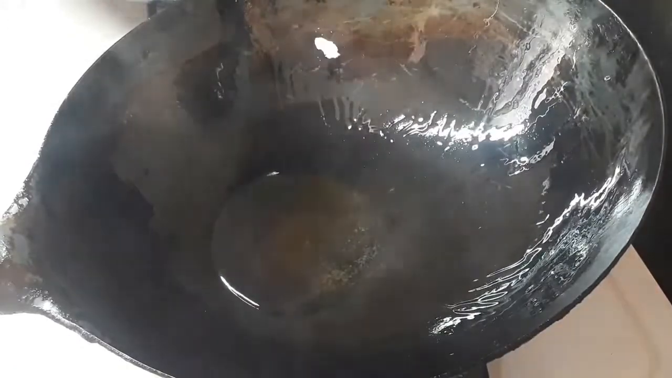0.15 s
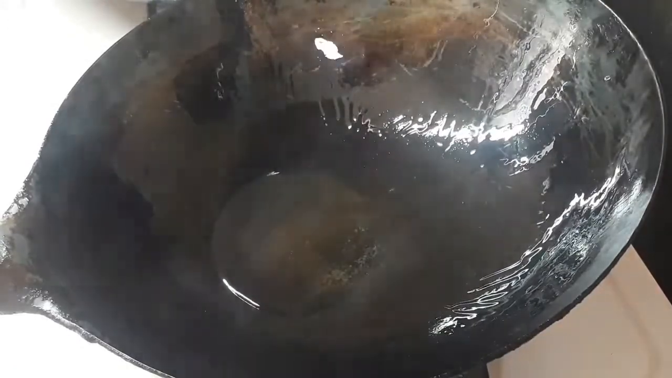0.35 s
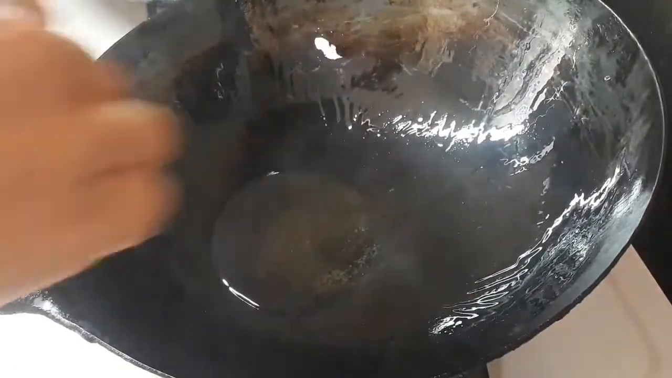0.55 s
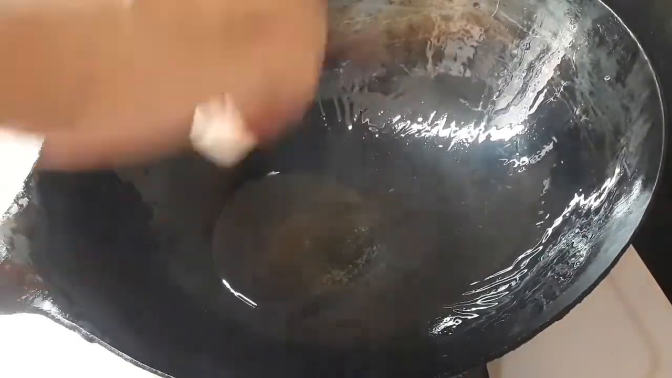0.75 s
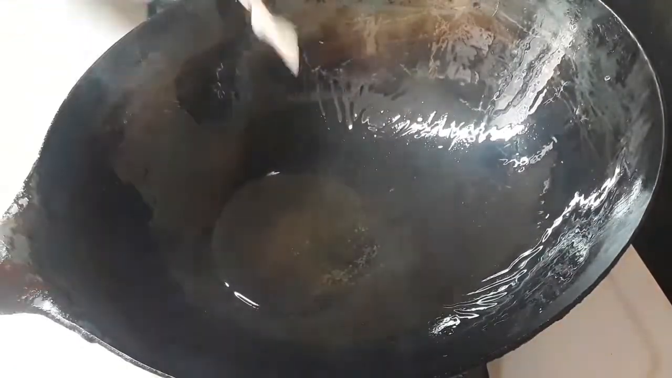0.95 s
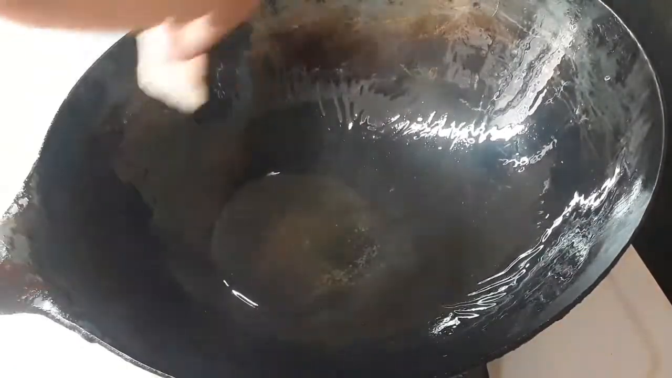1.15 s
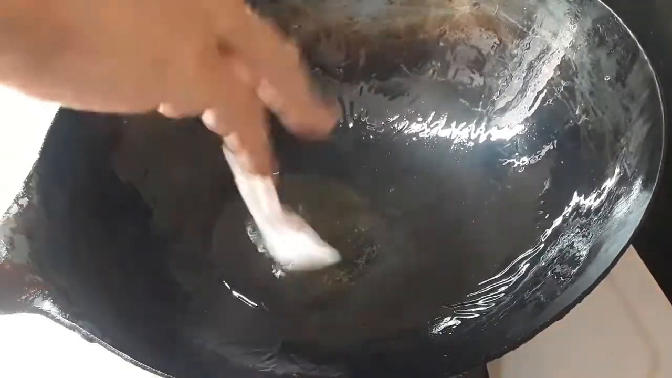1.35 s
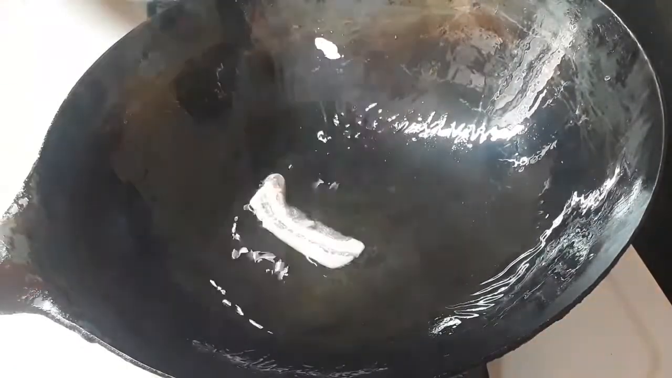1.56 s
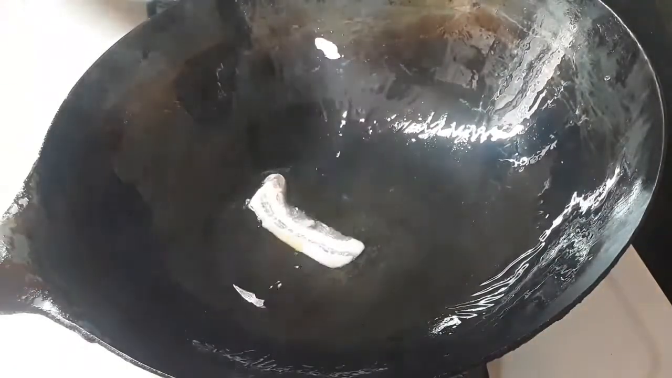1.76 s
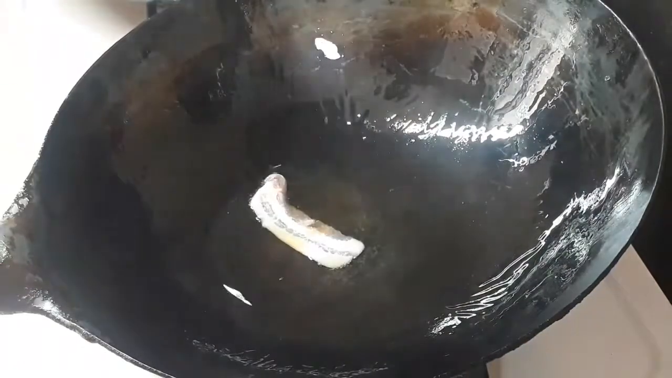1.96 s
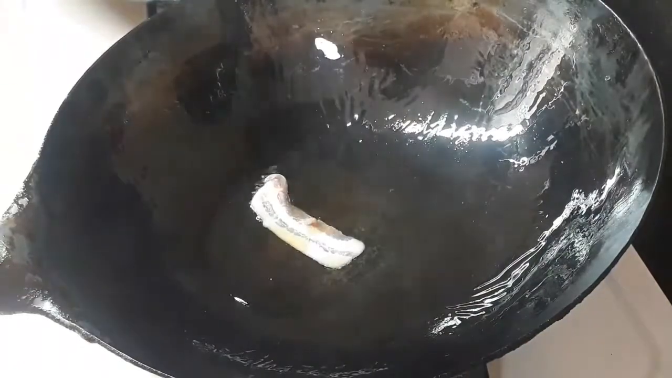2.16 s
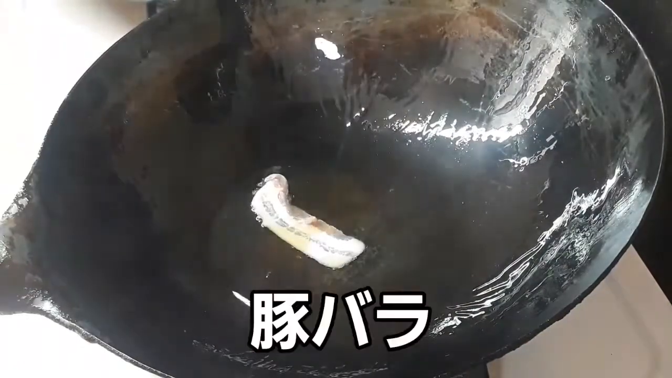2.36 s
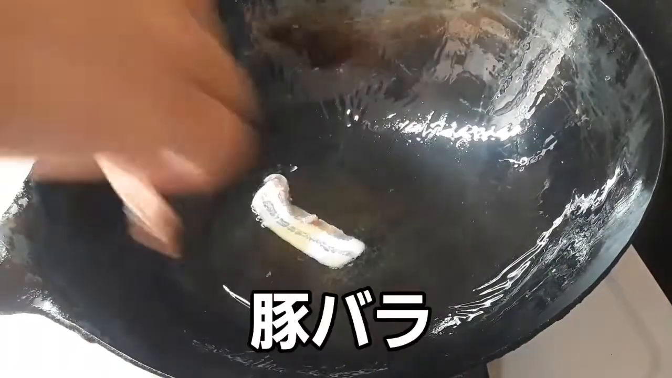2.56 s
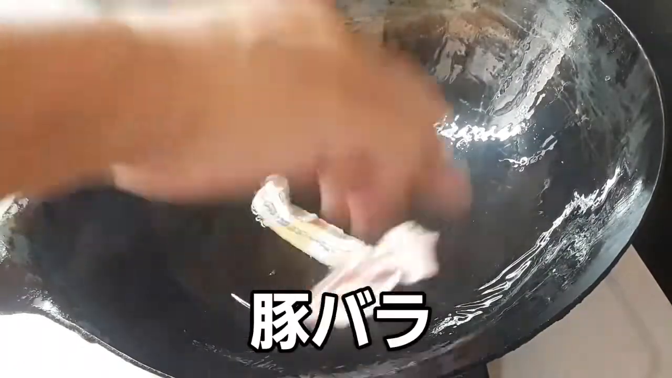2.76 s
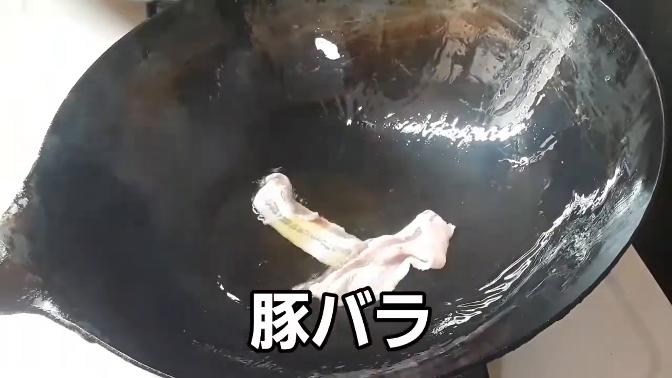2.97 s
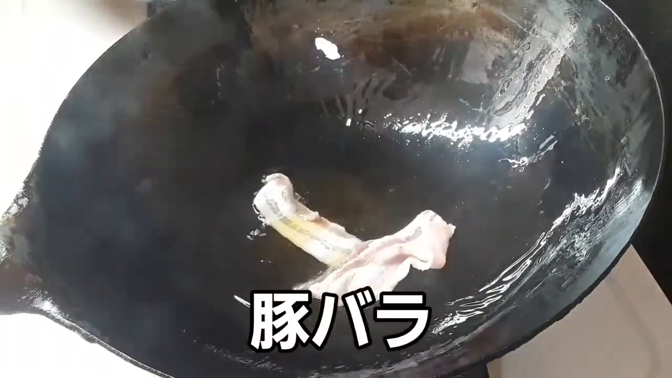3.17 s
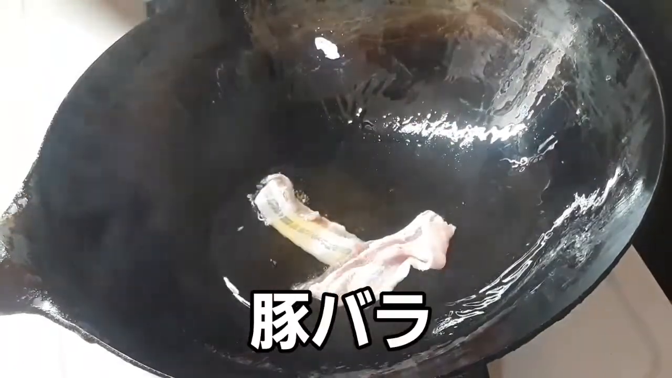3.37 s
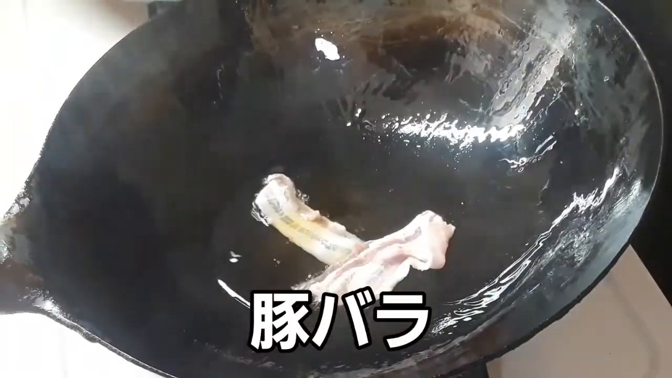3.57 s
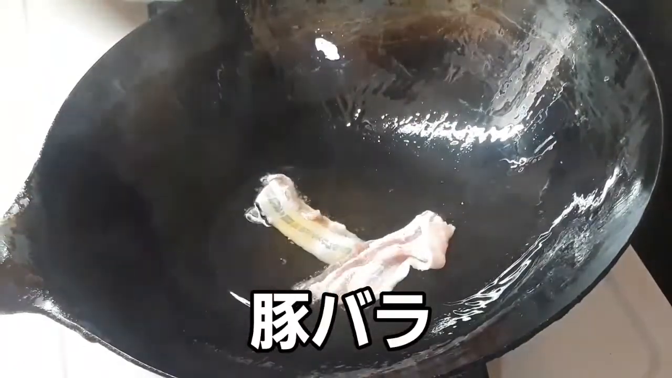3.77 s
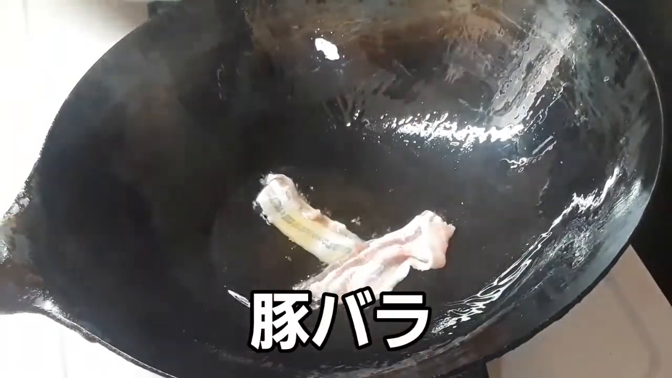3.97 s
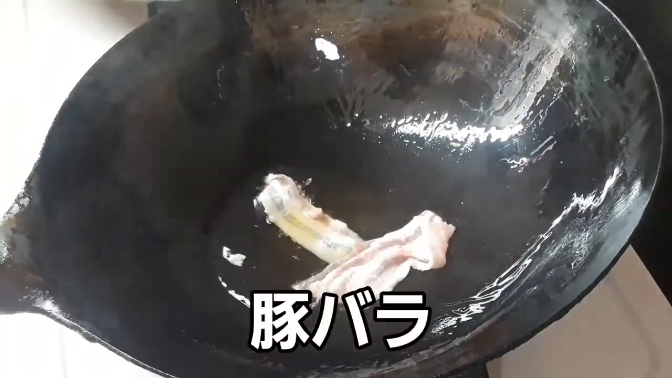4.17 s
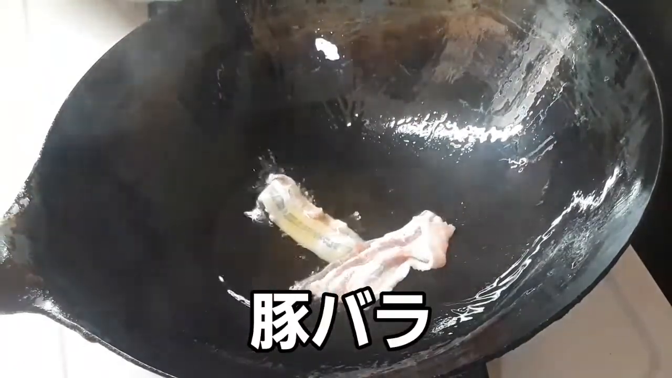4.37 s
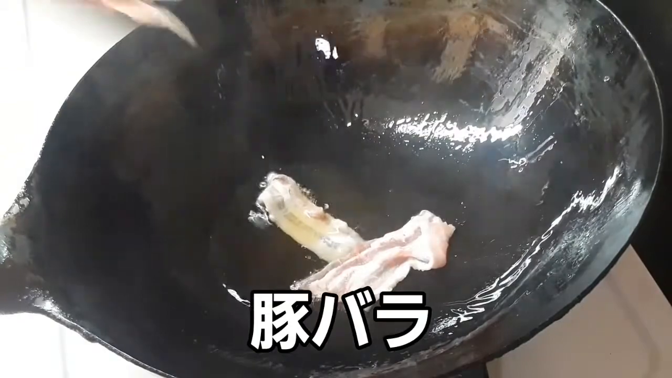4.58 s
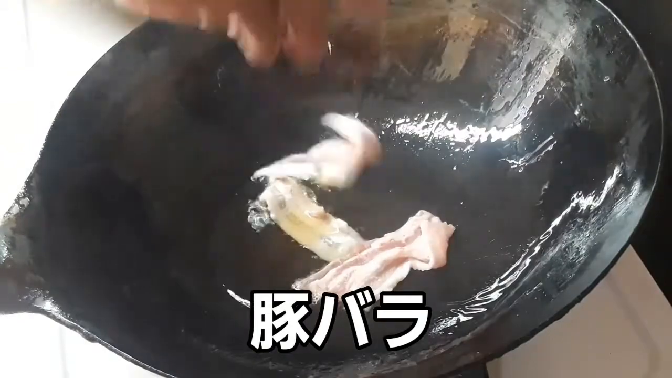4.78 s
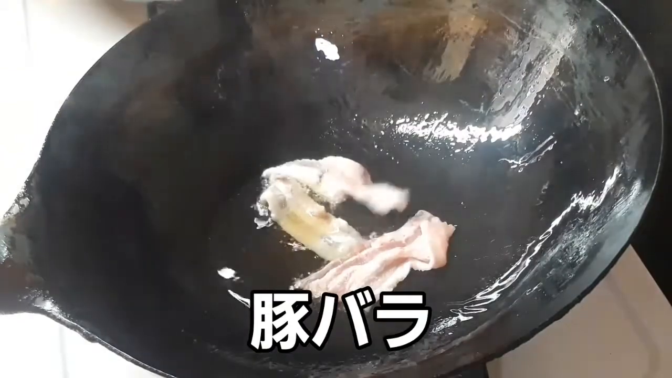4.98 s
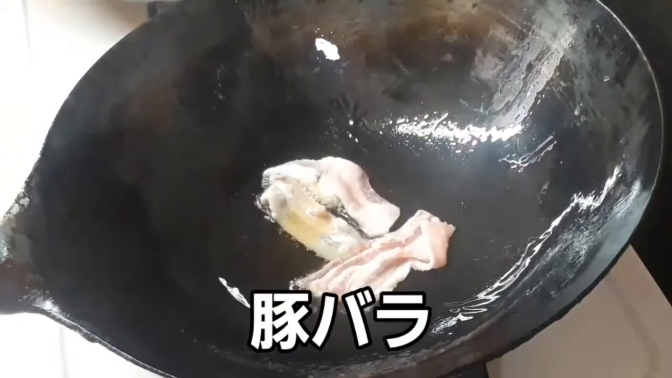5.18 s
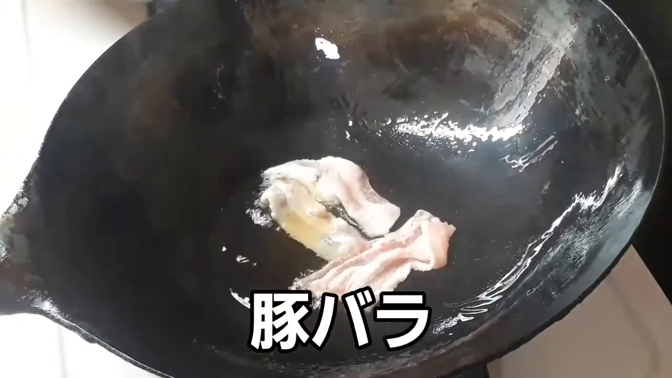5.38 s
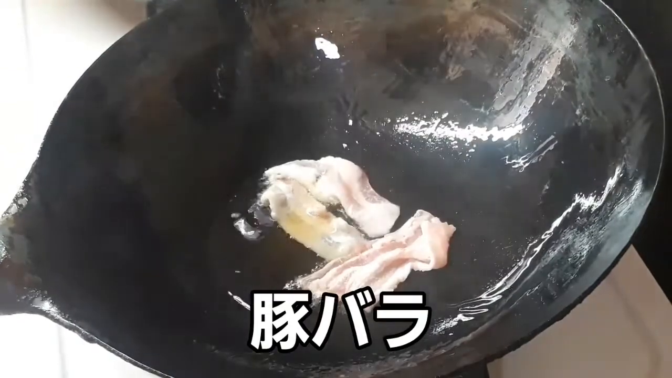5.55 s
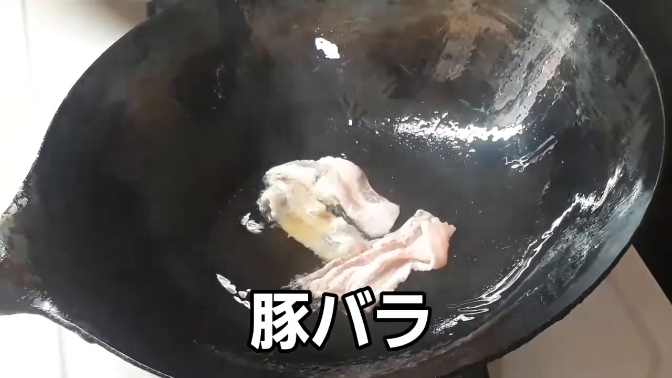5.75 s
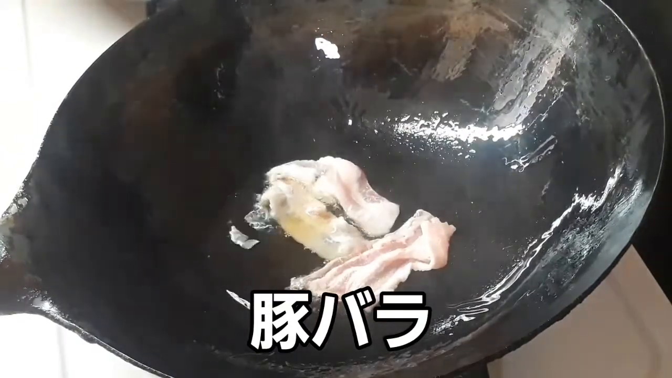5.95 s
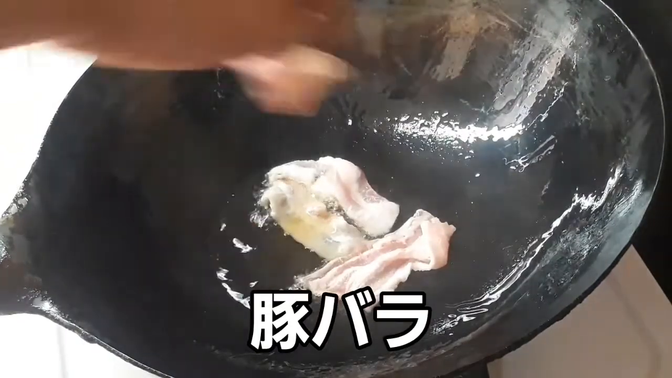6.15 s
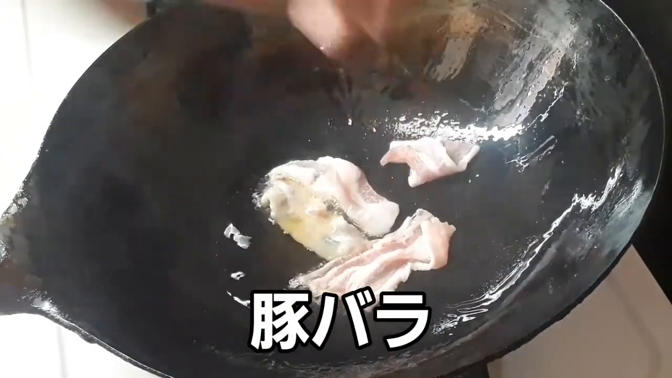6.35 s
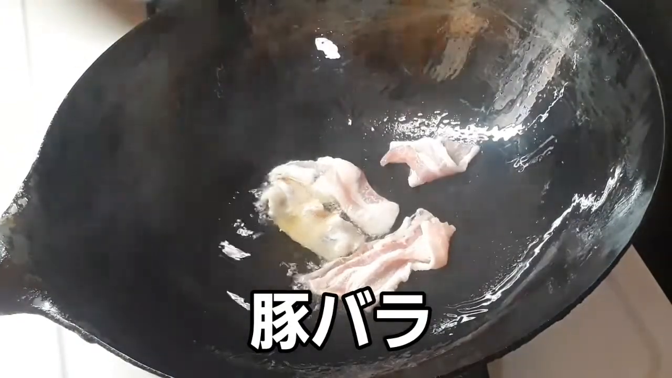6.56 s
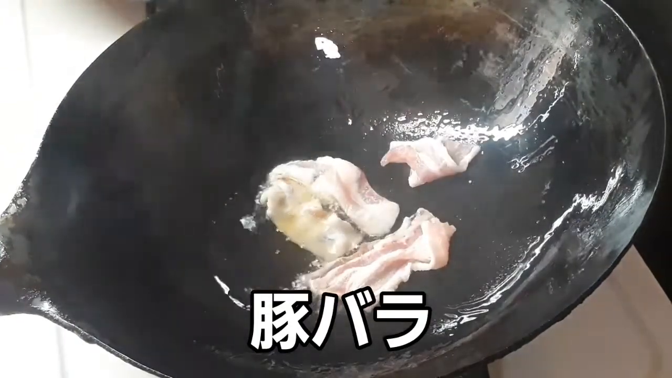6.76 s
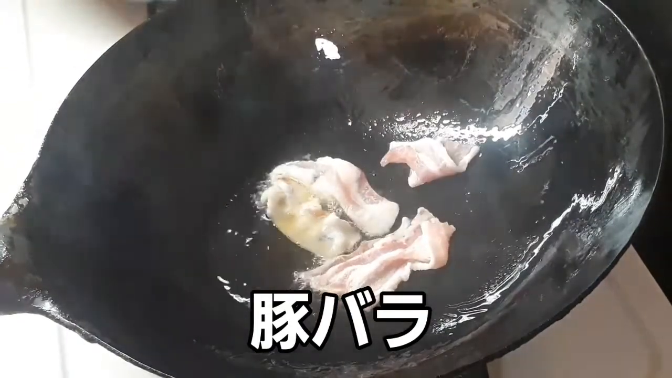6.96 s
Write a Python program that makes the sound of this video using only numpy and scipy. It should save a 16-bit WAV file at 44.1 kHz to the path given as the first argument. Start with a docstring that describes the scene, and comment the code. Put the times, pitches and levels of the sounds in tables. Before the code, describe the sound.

A low gas burner rush, a faint motor hum and a soft hiss of hot oil are heard close up in a small kitchen. At the very start there is a brief oil spit and a thin, falling whistle of steam, with a light knock at about 0.3 seconds and a sharp spit at 1 second. At about 1.5 seconds a slice of raw pork lands in the iron wok and sputters in short, irregular jets of steam. Near 2.9 seconds a second slice starts a much louder, dense sizzle, with bubbling underneath, sharp spits of oil and duller pops that ring slightly in the pan. The sizzle flares again at 4.8 seconds with a third slice, followed by a strong pop around 5.3. A fourth lands near 6.3 seconds amid a cluster of spits. At 6.4 everything steps down in level and keeps sizzling until about 7 seconds.

```python
"""Raw pork sizzles in hot oil: four slices are laid in turn into an iron wok in a small kitchen.
The first sputters in short jets of steam; from the second on, water boils out in countless bursting
bubbles, whose clicks merge into a dense sizzle, with sharp spits of oil and duller pops of steam.
All of these excite the modes of the wok. A gas burner and a motor hum lie underneath; a thin whistle
and a light knock come at the start, and near the end the whole sound steps down in level."""
import sys
import numpy as np
from scipy import signal
from scipy.io import wavfile
from scipy.ndimage import uniform_filter1d

SR = 44100
rng = np.random.default_rng(int(sys.argv[2]) if len(sys.argv) > 2 else 0)


def to_wav(sig):
    """Store sig (one row per channel, or 1-D mono) as 16-bit WAV at the path in sys.argv[1].

    Samples outside -1..1 are clipped; the rate is SR.
    """
    pcm = np.clip(np.atleast_2d(sig), -1, 1) * 32767
    pcm = np.round(pcm).astype(np.int16)
    wavfile.write(sys.argv[1], SR, pcm.T)  # frames by channels


N = 309582
TIME = np.arange(N) / SR
EVENT_TIME = np.arange(SR // 3) / SR

# Levels in the tables are relative: each layer also has its own gain.
# spectrum of the sputtering: f/Hz, level/dB
SPUTTER_SPECTRUM = [(200, 0), (600, -6.5), (1400, -0.5), (2300, -2.5), (2700, -6), (2900, -14), (3100, -4),
                    (3350, -3), (5000, 1.5), (7000, 3.5), (8500, 0.5), (10300, -4), (11500, -12),
                    (12400, -58)]
# steam jets from under the meat: t/s, peak level/dB, centre f/Hz, width/octaves
STEAM_JETS = [(1.55, -29, 7840, 0.66), (1.5754, -21.5, 5460, 0.71), (1.588, -20, 2900, 0.56),
              (1.613, -17, 6500, .6), (1.644, -20.5, 3600, .75), (1.691, -21.5, 4870, 0.18),
              (1.7964, -20.5, 5170, 0.76), (1.888, -29, 6100, 0.45), (1.962, -21, 5100, 0.24),
              (2.002, -30, 1880, 0.17), (2.0277, -27.5, 1440, 0.13), (2.117, -26, 2000, 0.9),
              (2.1478, -22, 3900, 0.61), (2.2204, -17, 3100, .42), (2.262, -19.5, 3800, 0.44),
              (2.368, -31, 7200, .5), (2.404, -27, 5500, 0.79), (2.581, -24, 3070, 1),
              (2.6437, -32.5, 3530, 0.21), (2.683, -27, 4840, 0.27), (2.714, -21, 3350, 0.44),
              (2.7264, -22.5, 2060, 0.47), (2.837, -30, 6600, 1), (3.85, -6.5, 6000, 0.13),
              (5.1644, -10.5, 3560, .3), (5.284, -7.5, 3370, 0.27), (5.89, -11, 5760, 0.51),
              (6.986, -11, 3820, 0.33)]
# steam pockets bursting under the meat: t/s, peak level/dB, f/Hz, T60/s
STEAM_POPS = [(1.679, -23.5, 2050, 0.025), (1.8669, -19.5, 2100, .016), (3.835, -12.5, 1850, 0.031),
              (3.998, -13, 2260, 0.018), (4.101, -18, 1270, .04), (4.306, -12.5, 2250, .04),
              (4.503, -10.5, 2070, 0.025), (4.864, -16.5, 1460, 0.043), (5.078, -11.5, 1720, 0.053),
              (5.284, -3.5, 2160, 0.048), (5.317, -10, 1770, 0.013), (5.756, -15.5, 1495, 0.11),
              (5.874, -9.5, 1350, 0.013), (6.179, -10, 1667, .045), (6.219, -16, 1770, 0.05),
              (6.322, -12.5, 1850, .019), (6.349, -13, 1800, 0.013), (6.393, -17.5, 700, 0.016),
              (6.395, -12.5, 2340, .05)]
# water drops exploding in the oil: t/s, peak level/dB
OIL_SPITS = [(-.012, -15.5), (.116, -44), (0.9907, -14), (3.029, -13.5), (3.851, -17), (4.02, -12),
             (4.3685, -13), (4.502, -9), (4.769, -13.5), (5.338, -11), (5.467, -15), (5.495, -23),
             (6.1, -15), (6.287, -13), (6.302, -21), (6.3221, -9.5), (6.356, -11), (6.392, -12),
             (6.6353, -13), (6.7016, -10.5), (6.791, -11), (6.877, -11), (6.975, -8.5)]
# slices two to four: t/s, flare level/dB, fizz level/dB, warm-up/s, boiling level/dB, steam level/dB
LATER_SLICES = [(2.86, -18.5, -18, 0.39, -27, -25), (4.834, -22, -15, 1.06, -36, -23),
                (6.27, -24.5, -21, .4, -31, -55)]
FIRST_SLICE_S, SIZZLE_START_S = 1.55, LATER_SLICES[0][0]
FIRST_ATTACK_S, LATER_ATTACK_S = 0.074, 0.036  # rise of the flare as a slice lands


def gain_of(db):
    """Converts a level to an amplitude ratio."""
    return 10 ** (np.asarray(db) / 20)


def unit_rms(x):
    """Normalises the mean power to 1."""
    return x / np.sqrt(np.mean(x ** 2) + 1e-20)


def unit_peak(x):
    """Normalises the mean power of the loudest 3 ms to 1."""
    return x / np.sqrt(uniform_filter1d(x ** 2, size=128).max())


def power_sum(gains):
    """Incoherent addition: the powers of independent sources add."""
    return np.sqrt(sum(g ** 2 for g in gains))


def at_frequency(points, hz):
    """Interpolates a curve on a logarithmic frequency axis."""
    f, value = np.transpose(points)
    return np.interp(np.log(hz + 1), np.log(f + 1), value)


def add(mix, s, sound):
    """Superposes a sound at time s, which may be negative."""
    start = round(s * SR)
    sound = sound[max(-start, 0):]
    part = mix[max(start, 0):][:len(sound)]
    part += sound[:len(part)]


def ramp(s, rise_s):
    """Linear rise from 0 to 1, starting at time s."""
    return np.clip((TIME - s) / rise_s, 0, 1)


def age(s):
    """Seconds since time s; zero before it."""
    return np.maximum(TIME - s, 0)


def decay(t, t60):
    """Exponential damping: 60 dB in t60 seconds."""
    return gain_of(-60 * t / t60)


def flare(s, attack_s, hold_s, release_s):
    """Transient envelope: linear rise, hold, exponential relaxation."""
    return ramp(s, attack_s) * np.exp(-age(s + attack_s + hold_s) / release_s)


def drift(per_s):
    """Slow random modulation of rms 1."""
    steps = rng.standard_normal(65536)
    return unit_rms(np.interp(TIME * per_s, np.arange(len(steps)), steps))


def colour(x, spectrum, size=4096):
    """Minimum-phase filter: shapes the spectrum while clicks keep their sharp front."""
    hz = abs(np.fft.fftfreq(size, 1 / SR))
    log_gain = np.log(gain_of(at_frequency(spectrum, hz)))
    response = np.exp(np.conj(signal.hilbert(log_gain)))
    taps = np.fft.ifft(response).real[:size // 2]
    return signal.oaconvolve(x, taps)[:len(x)]


def resonate(x, hz, width_hz):
    """Damped resonator of gain 1 whose centre frequency may glide."""
    carrier = np.exp(2j * np.pi * np.cumsum(hz * np.ones(len(x))) / SR)
    pole = np.exp(-np.pi * width_hz / SR)
    return 2 * (carrier * signal.lfilter([1 - pole], [1, -pole], x / carrier + 1e-18)).real


def ringing(x, peaks):
    """Linear superposition: the direct sound plus a ringing band at each spectral peak."""
    return x + sum(gain_of(db) * signal.lfilter(*signal.iirpeak(hz, hz / width, SR), x)
                   for hz, width, db in peaks)


def thud(hz, t60, push):
    """Impulse response of a small cavity: a blunt push and one damped mode."""
    t = EVENT_TIME
    return push * (t == 0) + np.sin(2 * np.pi * hz * t) * decay(t, t60)


def bursts(per_s, spread_db, clump_db, clumps_per_s):
    """Shot noise of bursting bubbles: many small clicks, few large, swelling in clumps."""
    sizes = gain_of(spread_db * np.minimum(rng.exponential(1, N), 6))
    signs = rng.choice([-1, 1], N)
    onsets = rng.random(N) < per_s / SR
    return unit_rms(sizes * signs * onsets * gain_of(clump_db * drift(clumps_per_s)))


def small_events(per_s, mean_db, spread_db, count=48):
    """Jittered event train during the full sizzle: rows of t/s, peak level/dB, size from 0 to 1."""
    jitter, strength, size = rng.random(count), rng.standard_normal(count), rng.random(count)
    times = SIZZLE_START_S + (np.arange(count) + jitter) / per_s
    return [row for row in zip(times, mean_db + spread_db * strength, size) if row[0] < N / SR]


def reverberate(x, bowl_db, room_db, bowl_t60=0.045):
    """Reverberation of one spot in the wok: direct sound, early echoes in the bowl, the room's tail."""
    # reverberation time of the kitchen: f/Hz, T60/s
    room_t60 = [(300, 0.11), (1300, 0.26), (3500, 0.3), (9000, .18)]
    t = EVENT_TIME
    bowl, tail = rng.standard_normal((2, len(t))) * (t > .001)
    hz, frame_s, spectra = signal.stft(tail, SR, nperseg=256)
    spectra = spectra * decay(frame_s, at_frequency(room_t60, hz)[:, None])
    tail = signal.istft(spectra, SR, nperseg=256)[1][:len(t)]
    echoes = gain_of(bowl_db) * unit_rms(bowl * decay(t, bowl_t60)) + gain_of(room_db) * unit_rms(tail)
    response = (t == 0) + echoes / np.sqrt(len(t))
    return signal.oaconvolve(x, response / np.linalg.norm(response))[:len(x)]


def scatter(clicks, bowl_db, room_db, spots):
    """Distributed source: clicks fall on several spots, each with its own echoes."""
    spot = rng.integers(0, spots, N)
    return sum(reverberate(clicks * (spot == k), bowl_db, room_db) for k in range(spots))


def burner():
    """Combustion noise: the gas flame's low, broadband rush."""
    # spectrum of the flame: f/Hz, level/dB
    spectrum = [(25, -66), (45, -3), (66, -1.5), (81, -11.5), (118, 1.5), (150, -7.5), (230, 1),
                (300, -5.5), (390, -4.5), (1080, -12.5), (1300, -12), (1650, -20), (2100, -19.5),
                (3000, -32), (6000, -43.5)]
    # level of the rush as heard, louder at times: t/s, level/dB
    levels = [(0, -40), (.4, -48), (.9, -43), (1.4, -48), (2.8, -44)]
    rush = unit_rms(colour(rng.standard_normal(N), spectrum))
    return rush * gain_of(np.interp(TIME, *np.transpose(levels)))


def oil_hiss():
    """Shot noise of the hot oil alone: dense, faint clicks merge into a hiss."""
    # spectrum of the oil: f/Hz, level/dB
    spectrum = [(2500, -35), (4000, -10), (6300, -9.5), (6800, -5), (7300, 2.5), (7900, -3.5), (9500, -6),
                (10800, -15.5), (12000, -65)]
    clicks = bursts(per_s=11000, spread_db=2.2, clump_db=0.68, clumps_per_s=18)
    return gain_of(-62.5) * unit_rms(colour(clicks, spectrum))


def motor_hum():
    """Three near-harmonic partials of a motor waver by random phase modulation."""
    # partials of the hum: f/Hz, level/dB
    partials = [(58.6, -59.5), (118.4, -68.5), (236.9, -61.5)]
    return sum(gain_of(db) * unit_rms(np.sin(2 * np.pi * hz * TIME + 1.17 * drift(7.6)))
               for hz, db in partials)


def knock():
    """Impact excitation: a light knock at the stove rings one hollow, heavily damped mode."""
    # the impact: t/s, peak level/dB, f/Hz, T60/s
    impacts = [(.265, -28, 966, .013)]
    spectrum = [(100, -1), (500, 3), (1800, 5), (3000, -24), (8000, -29)]  # f/Hz, level/dB
    out = np.zeros(N)
    for s, db, hz, t60 in impacts:
        hit = colour(thud(hz, t60, push=9.4), spectrum)
        add(out, s, gain_of(db) * unit_peak(reverberate(hit, bowl_db=-5, room_db=-28)))
    return out


def whistle(width_hz=260):
    """Narrow-band noise: a drop of water boils dry with a breathy, falling tone of steam."""
    # course of the whistle: t/s, f/Hz, level/dB
    glide = [(.06, 8300, -63), (.2, 8100, -61), (.245, 7740, -62), (.27, 6400, -64), (.31, 6150, -66),
             (.37, 5600, -80)]
    s, hz, db = np.transpose(glide)
    pitch = np.interp(TIME, s, hz)
    tone = resonate(resonate(rng.standard_normal(N), pitch, width_hz), pitch, width_hz)
    return unit_rms(tone) * gain_of(np.interp(TIME, s, db, left=-120, right=-120))


def wok_resonance(x):
    """Forced vibration: the frying drives the modes of the wok and its hollow."""
    # modes of the wok: f/Hz, bandwidth/Hz, level/dB re direct sound
    modes = [(423.2, 12.8, 12), (587, 77, -1.5), (666, 40, 4.5), (753, 43, 1), (875, 5.1, 9), (1006, 30, 1),
             (1145, 20, 0.5), (1263, 32, -4), (1437, 19, 0.5), (1680, 19, -1), (1880, 65, -2.5),
             (2065, 37, 2), (2368, 49, -1), (3240, 5.3, 3.5), (3688, 25, -39), (7090, 38, -5.5)]
    return ringing(x, modes)


def wok_reflections(x):
    """Interference: reflections in the wok give the sputter and all steam jets a fixed ringing colour."""
    # spectral peaks of the reflections: f/Hz, bandwidth/Hz, level/dB re direct sound
    peaks = [(2230, 190, -6), (2594, 72, 11), (3190, 74, -1), (3473, 35, 4.5), (3950, 110, -0.5),
             (4450, 55, -3), (5050, 74, -10), (5100, 57, -13), (7900, 89, -10)]
    return ringing(x, peaks)


def sputter():
    """Modulated shot noise: the first slice crackles, stirred by its jets, until the next one lands."""
    stirs = [gain_of(-39) * flare(s, 0.0082, 0.017, 0.04) for s, *_ in STEAM_JETS]
    simmer = power_sum([gain_of(-43)] + stirs)
    gate = ramp(FIRST_SLICE_S, FIRST_ATTACK_S) - ramp(SIZZLE_START_S, LATER_ATTACK_S)
    clicks = bursts(per_s=5000, spread_db=2.3, clump_db=3.9, clumps_per_s=60) * simmer * gate
    crackle = colour(scatter(clicks, bowl_db=-0.91, room_db=-2.5, spots=2), SPUTTER_SPECTRUM)
    return gain_of(-3.5) * clicks.std() * unit_rms(crackle)


def jets(skirt_db=-22):
    """Jet noise: steam breaks out with a snap and dies as a crackly rush, tuned by its gap."""
    out, t, hz = np.zeros(N), EVENT_TIME, np.geomspace(100, 13000, num=60)
    for s, db, centre_hz, octaves in STEAM_JETS:
        t60 = 0.078 * (centre_hz / 4040) ** 0.89  # a narrow gap sounds higher and empties more slowly
        rise_s = 0.001 * (t60 / 0.13) ** 2  # long jets open slowly
        snap = 1 + 1.8 * np.exp(-t / 0.00079)
        rush = rng.standard_normal(len(t)) * gain_of(2.9 * rng.standard_normal(len(t)))
        rush *= (1 - np.exp(-t / rise_s)) * decay(t, t60) * snap
        band = np.exp(-.5 * (np.log2(hz / centre_hz) / octaves) ** 2) + gain_of(skirt_db)
        spectrum = np.c_[hz, 20 * np.log10(band) + at_frequency(SPUTTER_SPECTRUM, hz)]
        jet = reverberate(colour(rush, spectrum), bowl_db=-8, room_db=-2.5)
        add(out, s, gain_of(db) * unit_peak(jet))
    return gain_of(-8.5) * out


def bubble_blips(low_hz=1150, high_hz=2250, t60=0.033, sizes=14):
    """Bubble resonance: larger bubbles under the meat ring briefly, each size at its own pitch."""
    out, t = np.zeros(N), np.arange(SR // 16) / SR
    clicks = bursts(per_s=110, spread_db=2.84, clump_db=0.33, clumps_per_s=27) * boil_envelope()
    size = rng.integers(0, sizes, N)
    for k, hz in enumerate(np.geomspace(low_hz, high_hz, num=sizes)):
        ring = np.sin(2 * np.pi * hz * t * (1 + t)) * decay(t, t60)  # pitch creeps up as it surfaces
        out += signal.oaconvolve(clicks * (size == k), ring)[:N]
    return gain_of(-12.5) * clicks.std() * unit_rms(reverberate(out, bowl_db=-10, room_db=-6))


def pops(low_hz=900, high_hz=2130, small_t60=0.015):
    """Cavity resonance: steam pockets give way with a pop and a splutter, larger ones lower and duller."""
    # spectrum of a pop: f/pitch, level/dB
    spectrum = [(.06, -21), (.25, -3.5), (.6, -1.5), (1, 3), (1.35, -1), (1.85, -1), (2.3, -11), (5, -29)]
    small_pops = [(s, db, high_hz * (low_hz / high_hz) ** size, small_t60)
                  for s, db, size in small_events(per_s=5, mean_db=-23, spread_db=1.1)]
    out, t = np.zeros(N), EVENT_TIME
    for s, db, hz, t60 in STEAM_POPS + small_pops:
        splutter = 1.75 * rng.standard_normal(len(t)) * decay(t, t60)
        pop = colour(thud(hz, t60, push=20.5) + splutter, np.array(spectrum) * [hz, 1])
        add(out, s, gain_of(db) * unit_peak(reverberate(pop, bowl_db=-15, room_db=-4)))
    return gain_of(-6) * out


def spits(echo_s=.0018, echo_gain=0.63, onset_delay_s=.0008):
    """Flash boiling: a water drop explodes in the oil, and the wok's far wall reflects the pulse."""
    # spectrum of a spit: f/Hz, level/dB
    spectrum = [(150, -21), (600, -10), (1500, -1.5), (2500, -6.5), (3000, -12), (4000, 0.5), (5500, -3),
                (7000, 3), (9000, 8.5), (11000, 5.5), (12000, -20), (12500, -40)]
    small_spits = [(s, db) for s, db, _ in small_events(per_s=3, mean_db=-16.5, spread_db=1.4)]
    out, t = np.zeros(N), EVENT_TIME
    for s, db in OIL_SPITS + small_spits:
        spray = .12 * rng.standard_normal(len(t)) * np.exp(-t / .0002)
        crack = (t == 0) + np.diff(spray, prepend=0)  # the pulse gives the body, the spray only treble
        crack += echo_gain * np.interp(t - echo_s, t, crack, left=0)
        spit = reverberate(colour(crack, spectrum), bowl_db=-1, room_db=-4)
        add(out, s + onset_delay_s, gain_of(db) * unit_peak(spit))
    return gain_of(-2) * out


def steam_leak(rise_s=.17, fade_db_per_s=4.5, fresh_hz=4750, settled_hz=3280, sink_s=0.22):
    """Amplitude and pitch of escaping steam: it fades as water runs out and sinks as the meat settles."""
    leaks = [gain_of(db - fade_db_per_s * age(s)) * ramp(s, rise_s) for s, *_, db in LATER_SLICES]
    pitches = [settled_hz + (fresh_hz - settled_hz) * np.exp(-age(s) / sink_s) for s, *_ in LATER_SLICES]
    strongest = np.argmax(leaks, axis=0)
    return power_sum(leaks), np.choose(strongest, pitches)


def boil_envelope(delay_s=0.024, rise_s=0.078):
    """Powers add: each later slice boils steadily once it lies flat, and loud pops stir up more."""
    steady = [gain_of(db) * ramp(s + delay_s, rise_s) for s, *_, db, _ in LATER_SLICES]
    stirs = [gain_of(db - 19.5) * flare(s, 0.0034, 0.0083, 0.03) for s, db, *_ in STEAM_POPS]
    return power_sum(steady + stirs)


def fizz_envelope(drying_db_per_s=3.5):
    """Evaporation: surface water flashes off on landing; later slices fizz as they warm, then dry."""
    first_flare = gain_of(-30.5) * flare(FIRST_SLICE_S, FIRST_ATTACK_S, 0.051, 0.023)
    flares = [gain_of(db) * flare(s, LATER_ATTACK_S, .05, 0.27) for s, db, *_ in LATER_SLICES]
    lasting = [gain_of(db - drying_db_per_s * age(s)) * (1 - np.exp(-age(s) / warm_s))
               for s, _, db, warm_s, *_ in LATER_SLICES]
    # loud spits throw a fizzing spray of oil over the meat
    sprays = [gain_of(db - 18) * flare(s, 0.0073, 0.011, 0.021)
              for s, db in OIL_SPITS if s > SIZZLE_START_S]
    return power_sum([first_flare] + flares + lasting + sprays)


def sizzle(surges_per_s=14, steam_widths_hz=(900, 2000)):
    """Shot noise in three bands: tiny bubbles fizz, larger ones boil, steam hisses through a gap."""
    # spectrum of the tiny bubbles: f/Hz, level/dB
    fizz_spectrum = [(400, -30), (2500, -14), (4500, -9), (5700, -6.8), (6500, -4), (7100, -.7), (8000, 0),
                     (9500, -1), (10400, -4), (11000, -8), (11500, -15.5), (12000, -25), (12450, -38)]
    # spectrum of the boiling under the meat: f/Hz, level/dB
    boil_spectrum = [(120, -33), (330, -22), (520, -8.5), (680, -4.5), (920, -7.5), (1150, -5), (1320, 5.5),
                     (1450, 2), (1590, -2.5), (1780, 1.5), (2150, -1), (2700, -10.5), (4500, -31)]
    leak, leak_hz = steam_leak()
    fizz = bursts(per_s=9000, spread_db=3.77, clump_db=1.14, clumps_per_s=120) * fizz_envelope()
    fizz *= gain_of(0.85 * drift(surges_per_s))
    boil = bursts(per_s=2600, spread_db=2.9, clump_db=1.2, clumps_per_s=100) * boil_envelope()
    boil *= gain_of(1.5 * drift(surges_per_s))
    steam = bursts(per_s=5000, spread_db=2.8, clump_db=1.3, clumps_per_s=70) * leak
    steam *= gain_of(2.9 * drift(surges_per_s))
    hiss = scatter(steam, bowl_db=0.67, room_db=-3, spots=6)
    for width_hz in steam_widths_hz:
        hiss = resonate(hiss, leak_hz, width_hz)
    crackle = colour(scatter(fizz, bowl_db=-4, room_db=-2, spots=16), fizz_spectrum)
    bubbling = colour(scatter(boil, bowl_db=-4, room_db=-10, spots=12), boil_spectrum)
    return (gain_of(0.36) * fizz.std() * unit_rms(crackle)
            + gain_of(-4) * boil.std() * unit_rms(bubbling)
            + gain_of(-4.5) * steam.std() * unit_rms(hiss))


def scene(step_s=6.4, step_db=-5):
    """Superposition: the frying rings the wok over the background; late on, the level steps down."""
    frying = wok_reflections(sputter() + jets()) + sizzle() + bubble_blips() + pops() + spits()
    kitchen = wok_resonance(frying) + whistle() + knock() + burner() + oil_hiss() + motor_hum()
    return (kitchen * gain_of(step_db * ramp(step_s, rise_s=0.012)))[None]


def record(dry, ceiling=.88, cutoff_hz=12450):
    """Soft saturation rounds the loudest peaks; a low-pass filter then limits the band."""
    rounded = dry / (1 + (dry / ceiling) ** 6) ** (1 / 6)
    low_pass = signal.firwin(511, cutoff_hz, window=("kaiser", 9), fs=SR)
    return signal.oaconvolve(rounded, low_pass[None], "same")


dry = scene()
out = record(dry)
to_wav(out)
```